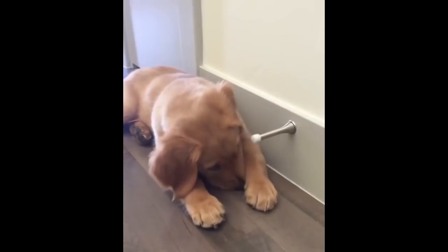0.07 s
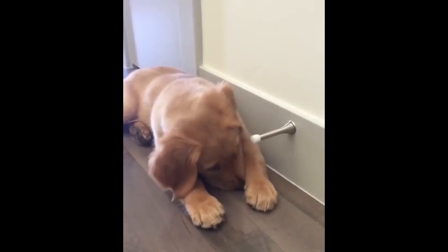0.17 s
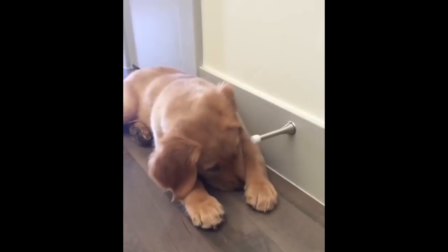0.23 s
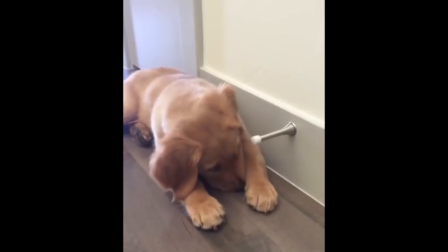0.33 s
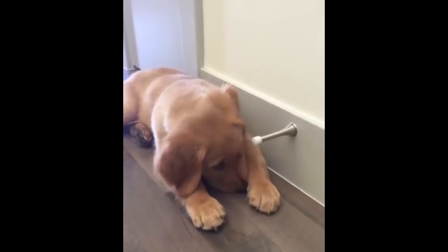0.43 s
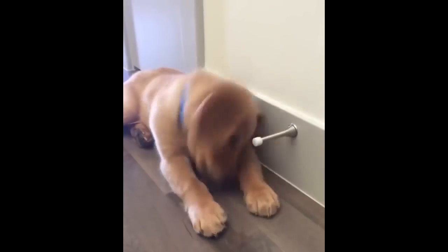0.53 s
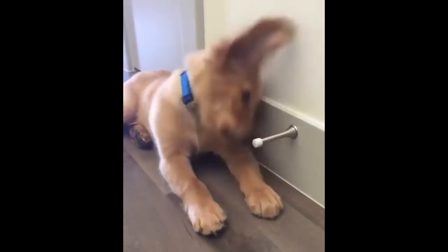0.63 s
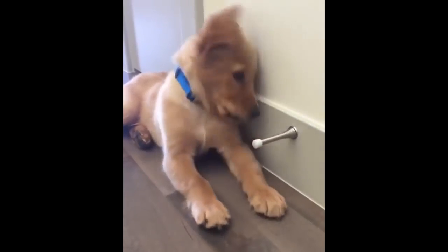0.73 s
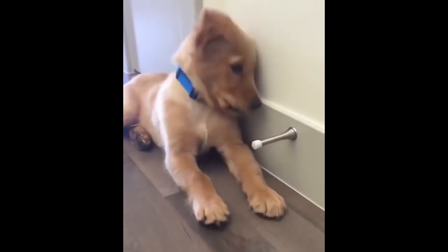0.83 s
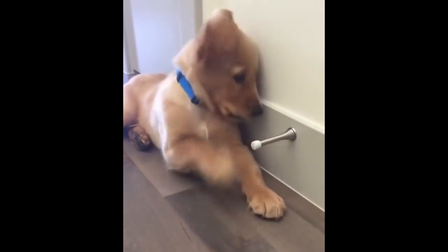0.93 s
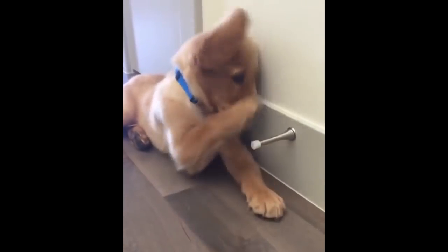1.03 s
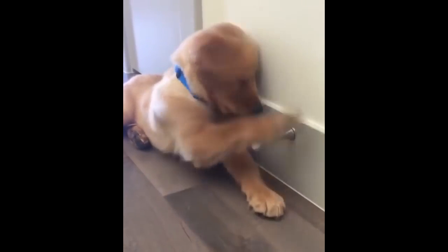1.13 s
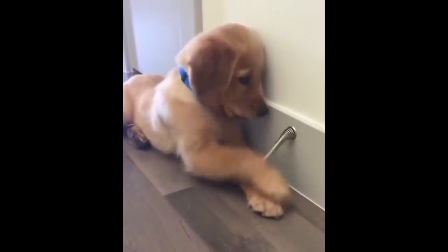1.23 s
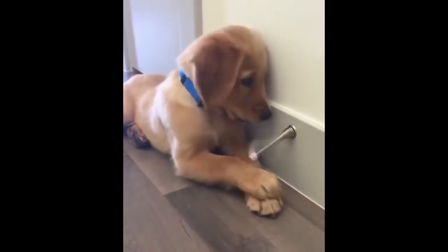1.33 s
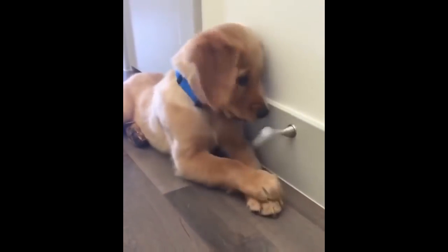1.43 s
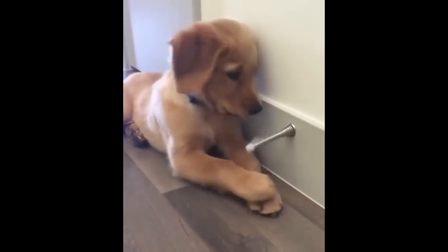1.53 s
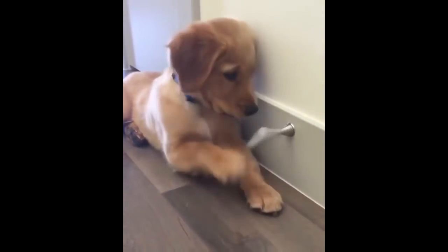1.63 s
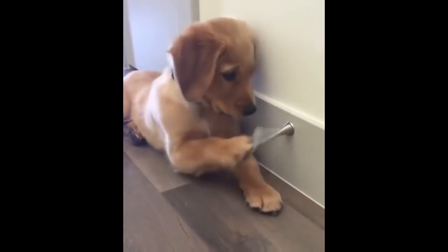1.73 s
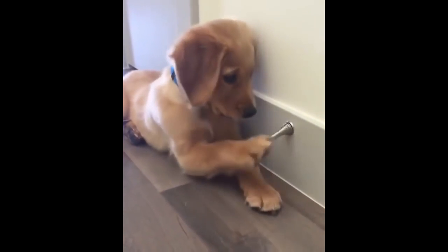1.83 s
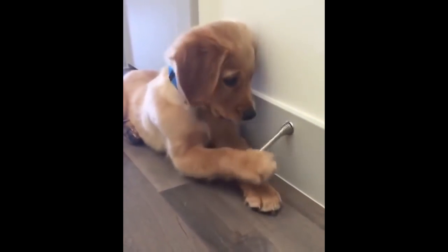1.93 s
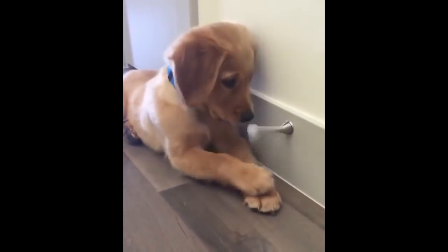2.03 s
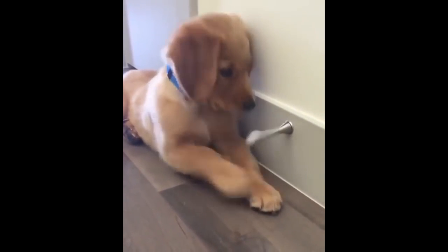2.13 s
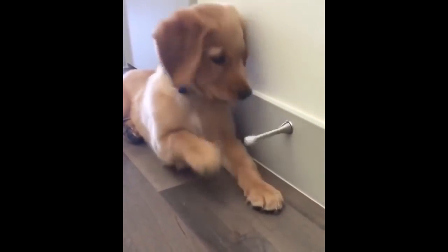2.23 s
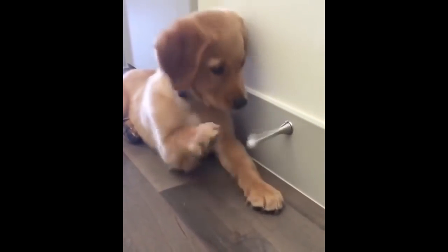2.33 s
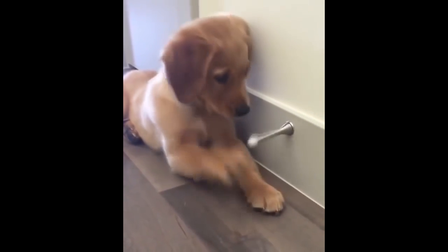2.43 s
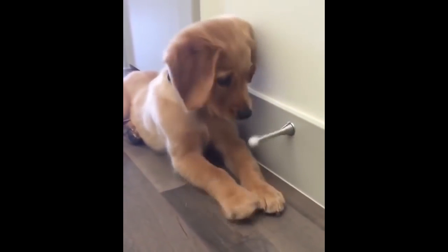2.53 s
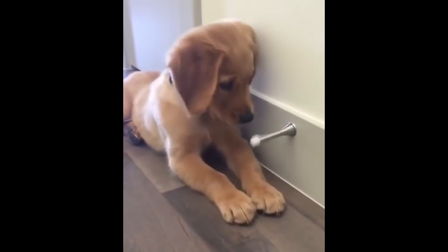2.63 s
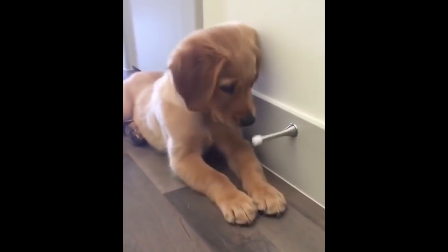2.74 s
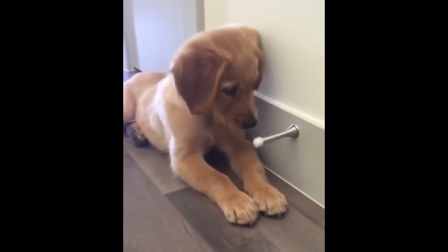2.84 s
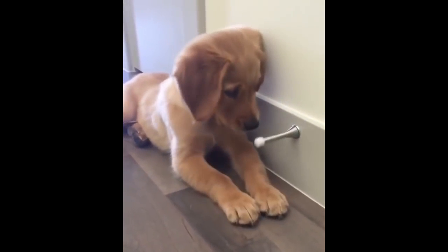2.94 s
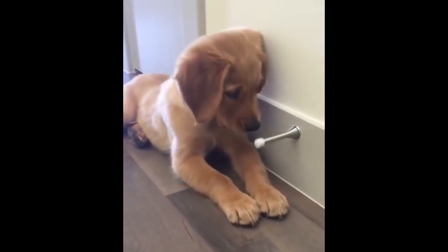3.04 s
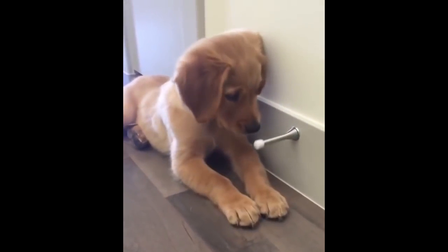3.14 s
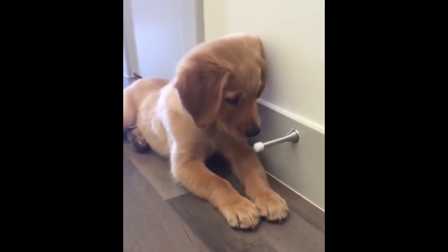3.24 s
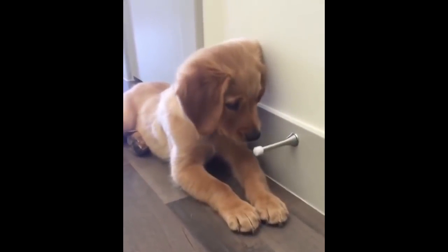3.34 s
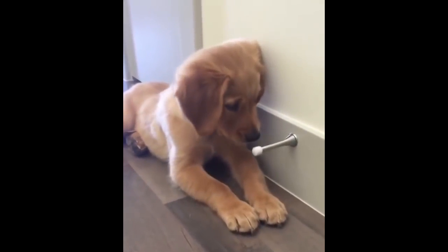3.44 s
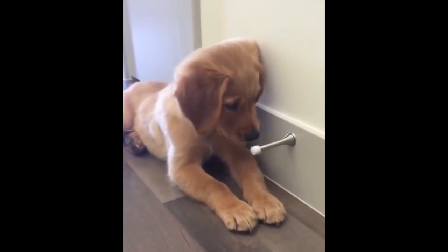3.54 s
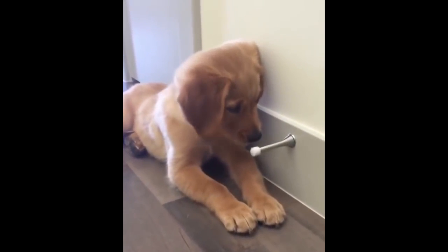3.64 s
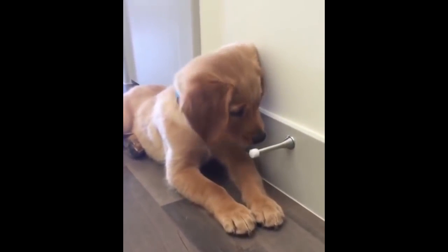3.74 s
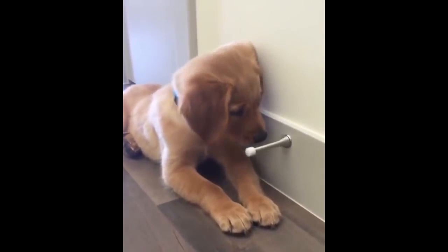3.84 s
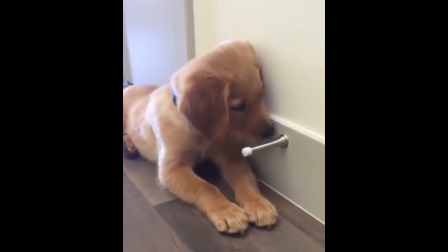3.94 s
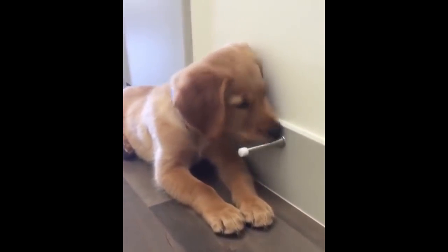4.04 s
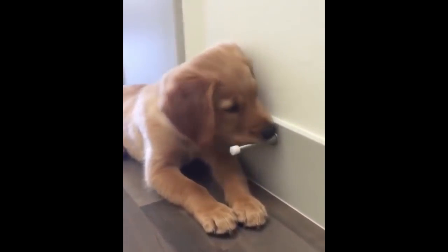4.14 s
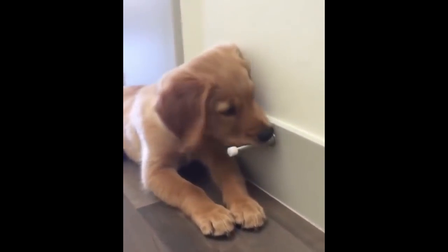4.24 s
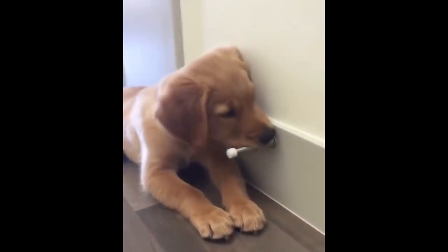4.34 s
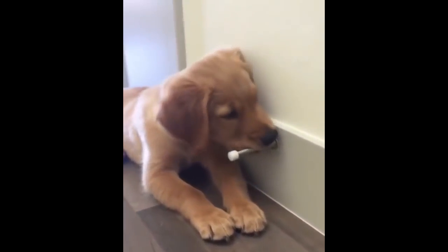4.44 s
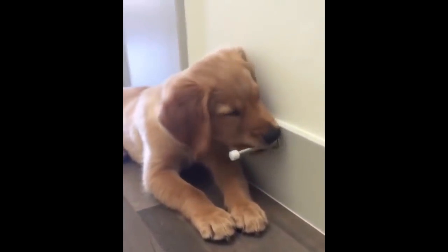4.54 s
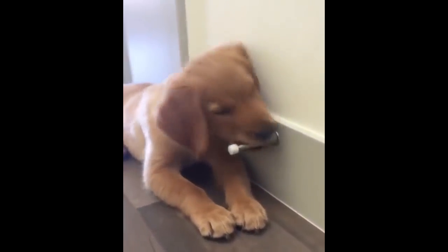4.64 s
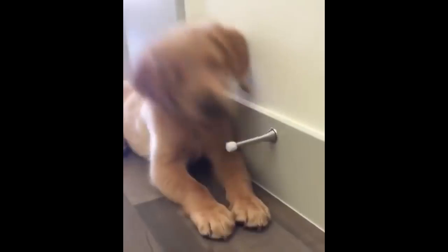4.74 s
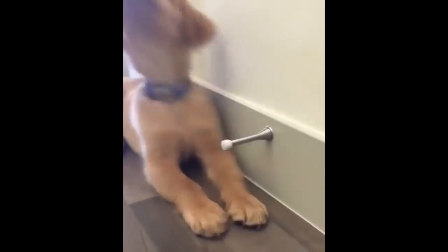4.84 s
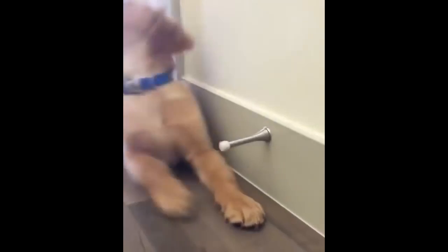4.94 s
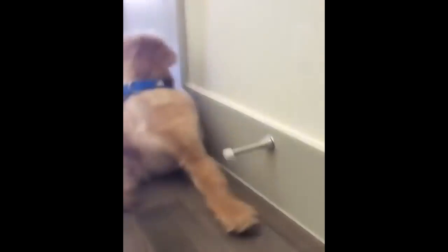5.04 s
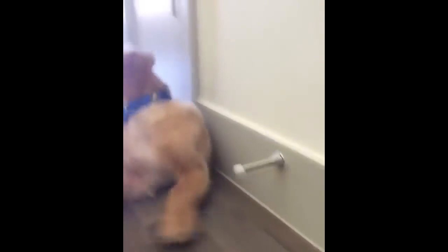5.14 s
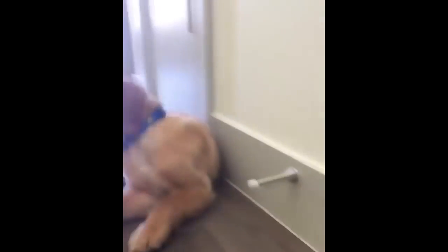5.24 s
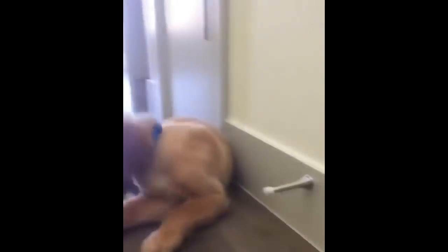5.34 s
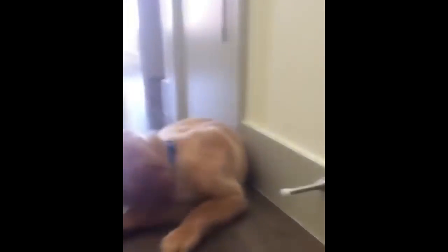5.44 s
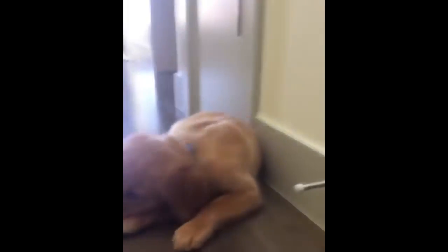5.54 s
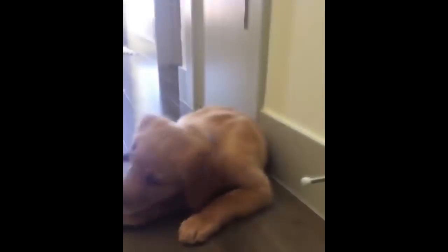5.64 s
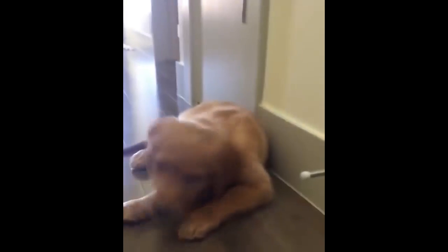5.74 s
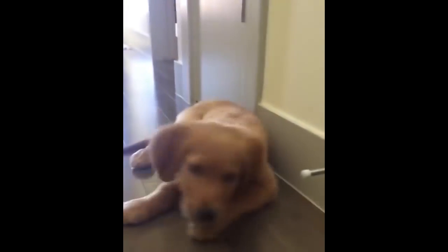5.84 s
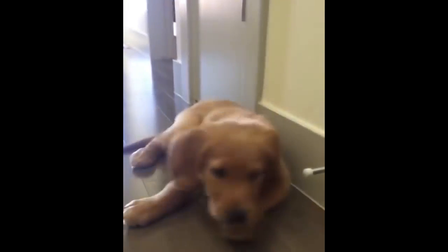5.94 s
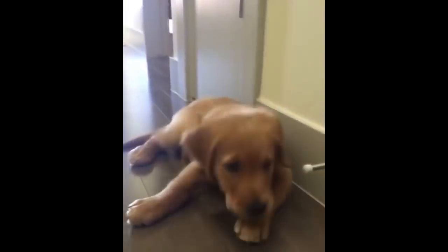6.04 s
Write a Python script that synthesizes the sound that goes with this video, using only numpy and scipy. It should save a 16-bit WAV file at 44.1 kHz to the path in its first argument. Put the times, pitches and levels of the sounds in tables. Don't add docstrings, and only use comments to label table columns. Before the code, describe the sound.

In a quiet hard-floored room, a dying spring buzz and echo open the scene, then faint fur rustle. A puppy's paw touches a coiled door stopper, and it twangs loudly in a rapid clacking flutter, stops, then twangs again, quickening and shrinking to a soft wall hum. Dull nudges, small claw ticks and scuffing paws follow. Close phone microphone, low distant motor hum.

```python
import sys
import numpy as np
from scipy import signal
from scipy.fft import rfft, irfft, next_fast_len
from scipy.io import wavfile
from scipy.ndimage import uniform_filter1d

SR = 44100
rng = np.random.default_rng(int(sys.argv[2]) if len(sys.argv) > 2 else 0)


def rack_gain(trim_db):
    fader = np.asarray(trim_db, float)
    return 10 ** (fader / 20)


def generate_wav(sig):
    pcm = np.round(np.clip(np.atleast_2d(sig).T, -1, 1) * 32767).astype(np.int16)
    wavfile.write(sys.argv[1], SR, pcm)


N = 267775
TIME = np.arange(N) / SR

# start_s, peak_db, clack_minus_peak_db
NUDGES = [(0.639, -49.5, -14), (3.264, -26, -3.5), (3.305, -30.5, -36), (3.465, -32, -17),
          (3.507, -28.5, -9.5), (3.55, -32, -26), (4.265, -39.5, 4), (4.346, -45, -17), (4.378, -45, -19.5),
          (4.452, -37.5, -20), (4.486, -41.5, -21), (4.519, -55, -15.5), (4.812, -35.5, -19),
          (5.016, -53.5, -12), (5.15, -51, -15.5)]
# start_s, clack_db, thump_minus_clack_db, ticks_minus_clack_db, pitch_hz
FIRST_TWANG = [(1.4718, -1.5, -12, -15, 8206), (1.5059, -1.5, -11.0, -18.6, 4215),
               (1.5387, 1.9, -11.5, -14, 5800), (1.5711, -6.5, -10.5, -18.5, 5400),
               (1.6043, -1.5, -17.5, -14, 6195), (1.6383, -7, -12, -16.5, 4190),
               (1.6714, -8.0, -13, -18.5, 4190), (1.703, -3.5, -13.1, -18.5, 4590),
               (1.735, -11, -10.3, -10.8, 5800), (1.7674, -3.0, -15.7, -12.5, 4600),
               (1.8006, -9.5, -14.0, -15.5, 4190), (1.8311, -5.5, -16, -11.8, 9020),
               (1.8664, -11, -20.4, -19.5, 5800), (1.8934, -3.5, -17.5, -18.5, 4200),
               (1.9267, -10.1, -8.5, -13, 4206), (1.956, 0.8, -16.5, -21.5, 4990)]
# start_s, swings_per_s, return_early_share (of a swing)
SWING_RATE = [
    (2.1527, 16.70, .089),
    (2.45, 18.4775, .067),
    (2.7, 20.8558, .05),
    (2.95, 23.5492, .028),
    (3.2, 24.9259, .012),
    (3.5, 24.1381, .012),
    (3.6, 21.6592, .012),
    (3.7, 25.3727, .012),
    (4.2, 27.18, .012),
]


def unit(x):
    return x / np.sqrt(np.mean(x ** 2))


def band(x, lo_hz, hi_hz):
    edges_hz = [lo_hz, min(hi_hz, .45 * SR)]
    return signal.sosfilt(signal.butter(2, edges_hz, "bandpass", fs=SR, output="sos"), x)


def colour(x, points):
    hz, db = np.transpose(points)
    size = next_fast_len(N)
    log_hz = np.log(np.arange(size // 2 + 1) * SR / size + 1)
    gain = rack_gain(np.interp(log_hz, np.log(hz), db))
    return irfft(rfft(x, size) * gain, size)[:N]


def ring(x, hz, t60):
    pole = np.exp(2j * np.pi * hz / SR - np.log(1000) / (t60 * SR))
    return signal.lfilter([1], [1, -pole], x).imag


def modes(force, table):
    return sum(rack_gain(db) * ring(force, hz, t60) for hz, db, t60 in table)


def curve(tables, column):
    rows = np.concatenate(tables)
    inside = sum((TIME >= t[0][0]) & (TIME <= t[-1][0]) for t in tables)
    return np.interp(TIME, rows[:, 0], rows[:, column]), uniform_filter1d(1. * inside, size=800)


def strikes(s, db, rise_s, fall_s):
    train = np.zeros(N)
    np.add.at(train, (np.asarray(s) * SR).astype(int), rack_gain(np.asarray(db)))
    t = TIME[:2000]
    shape = (1 - np.exp(-t / rise_s)) * np.exp(-t / fall_s)
    return signal.fftconvolve(train, shape / shape.max())[:N]


def grit(spread_db):
    grain = np.repeat(rng.exponential(size=N // 8 + 1), 8)[:N]
    return unit(rng.standard_normal(N) * rack_gain(spread_db * grain))


def walk(rate):
    k = int(SR / rate)
    steps = np.repeat(rng.standard_normal(N // k + 1), k)
    return uniform_filter1d(uniform_filter1d(steps, k), k)[:N]


def background():
    # freq_hz, level_db (per Hz)
    air_spectrum = [(15, -55.5), (25, -24.5), (40, -11.5), (108, 0), (145, -19), (212, -24), (256, -33.5),
                    (405, -29.5), (439, -37), (659, -38.5), (1230, -42), (12900, -60), (16000, -80.5)]
    # freq_hz, level_db, crest_s
    hum_lines = [
        (53.4, -54, .4),
        (58.1, -58, .4),
        (106.75, -53, .4),
    ]
    # start_s, low_line_db, octave_db
    hum_load = [
        (0, -2, -8),
        (1.4, -3, -5),
        (3.0, 3, -1.5),
        (4.6, 4.5, 0.5),
        (5.1, -2, 0),
        (6.07, -3, -1),
    ]
    air = colour(rng.standard_normal(N), air_spectrum)
    air = air * rack_gain(-54) / np.std(band(air, 130, 16000))
    low, other, octave = (rack_gain(db + 2 + 1.2 * walk(9.9)) * np.cos(2 * np.pi * hz * (TIME - s))
                          for hz, db, s in hum_lines)
    low_db, octave_db = (curve([hum_load], column=k)[0] for k in (1, 2))
    hum = low * rack_gain(low_db) + rack_gain(-1.0) * other + octave * rack_gain(octave_db)
    return band(air, 120, 18000) + rack_gain(-14.0) * band(air, 20, 130) + hum


def earlier_echo():
    dull = [(150, -8), (240, 0), (400, -16), (800, -12), (1600, -18.5), (3000, -32.5), (8000, -54)]  # Hz, dB
    t60_s = 0.72
    return rack_gain(-40.5 - 60 * TIME / t60_s) * unit(colour(rng.standard_normal(N), dull))


def swing_ends(table):
    at, hz, early = np.transpose(table)
    t = TIME[(TIME >= at[0]) & (TIME <= at[-1])]
    turns = np.cumsum(np.interp(t, at, hz)) / SR
    k = np.arange(int(2 * turns[-1]) + 1)
    back = k % 2
    rough_s = np.interp(k / 2, turns, t)
    end_turns = k / 2 - back * np.interp(rough_s, at, early)
    return np.array([np.interp(end_turns, turns, t), back])


def dying_swing():
    # start_s, level_db
    swings = [
        [(0.0, -42.5), (0.236, -38.5), (0.3, -50), (0.62, -74)],
        [(3.1, -48), (3.4, -45.5), (3.65, -49.5), (3.95, -54.5), (4.15, -57.5), (4.22, -71.5)],
    ]
    # start_s, level_db
    sing = [
        [(0.0, -55.5), (0.2, -72.5), (0.26, -92)],
        [(3.14, -52), (3.3, -54), (3.52, -58.5), (3.62, -77)],
    ]
    sing_hz = (3096, 3660)
    # freq_hz, level_db, t60_s
    panel_modes = [(204, 4, 0.11), (260, 2, 0.07), (293, -8, 0.12), (339.2, 4, 0.19), (361.3, 5, 0.14),
                   (384, 8, .07), (539.4, -9.5, .2), (616, -11, 0.09), (700, -12, 0.1)]
    # start_s, pitch_hz, level_db
    rest_hum = [
        (3.94, 342, -64),
        (4.04, 337.2, -52.5),
        (4.058, 338, -62),
        (4.112, 337.9, -53),
        (4.22, 337.6, -71.5),
    ]
    swing_hz, swing_start_s, return_db = 24.697, 0.021, -16.5
    early = TIME < 1
    count = np.arange(30)
    late_s, back = swing_ends(SWING_RATE)
    s = np.concatenate([swing_start_s + count / (2 * swing_hz), late_s + 0.00607])
    db = return_db * np.concatenate([count % 2, back]) + 1.3 * rng.standard_normal(len(s))
    pull = strikes(s, db, 0.00037, 0.0005)
    swell = rack_gain(-24) * ring(ring(pull * early, 382, .036), 378, .05)
    panel = band(modes(pull, panel_modes), 170, 750) * rack_gain(np.where(early, -5, -1.2))
    level_db, on = curve(swings, column=1)
    tugs = (panel + swell) * rack_gain(level_db - 35.0) * on
    hum_hz, humming = curve([rest_hum], column=1)
    hum_db = curve([rest_hum], column=2)[0]
    hum = rack_gain(hum_db) * humming * np.sin(2 * np.pi * np.cumsum(hum_hz) / SR)
    sing_db, sounding = curve(sing, column=1)
    bunching = (1 + 0.9 * np.cos(2 * np.pi * swing_hz * (TIME - .012))) ** 1.83
    touches = grit(1.6) * bunching * rack_gain(sing_db - 28.5) * sounding
    chatter = ring(touches * early, sing_hz[0], 0.0292) + ring(touches * ~early, sing_hz[1], 0.0218)
    return tugs + hum + band(chatter, 2000, 5500)


def slaps():
    # start_s, thump_db, clack_db, ticks_db, pitch_hz
    flicks = [
        (1.329, -27, -34, -25, 4600),
    ]
    # start_s, clack_db, thump_minus_clack_db, ticks_minus_clack_db, pitch_hz
    second_twang = [(2.1534, 1.2, -12, -22, 8600), (2.179, 1.5, -13, -18.5, 9000),
                    (2.2122, -5.5, -13.2, -24.5, 8200), (2.24, -3.2, -15, -21, 8990),
                    (2.2665, -18.3, -10.7, -16, 6200), (2.297, -14.4, -2, -14, 8200),
                    (2.3255, -6.5, -12.5, -18.5, 5806), (2.3527, -12.5, -10, -22, 4200),
                    (2.3789, -4.8, -14, -21.2, 4600), (2.409, -5.5, -24, -19, 9000),
                    (2.4376, -14, -15.1, -14.5, 4195), (2.4626, -5.9, -12.6, -22.5, 8590),
                    (2.4924, -17.5, -6, -14, 4207), (2.5157, -8, -12, -23.5, 4204),
                    (2.5464, -6, -10.3, -13, 6200), (2.5666, -1.5, -13.5, -24.0, 5000),
                    (2.5972, -3.5, -18.5, -20.5, 5800), (2.6149, -20.5, 1.1, -11, 6595),
                    (2.6452, -10, -11.5, -13, 5403), (2.6657, -21.6, -5, -14, 6600)]
    narrowing = [(2.6948, -26.2, -2, -2.5, 6600), (2.7169, -13.0, -11, -19.5, 8600),
                 (2.7423, -18.5, -5.5, -7, 6600), (2.7644, -5, -16.5, -26, 4210),
                 (2.7888, -8, -10.4, -12.4, 4200), (2.8067, -14.5, -5.6, -20, 4200),
                 (2.8338, -6.5, -9.5, -19.5, 5800), (2.8517, -20.6, 0, -23.2, 8990),
                 (2.8784, -21, -0.5, -6.5, 4590), (2.8957, -10, -24, -23.5, 4200),
                 (2.9216, -11, -11, -19, 5390), (2.9413, -20.5, -7.9, -28, 4990),
                 (2.9645, -17, -7.5, -16, 5400), (2.9814, -16, -13.6, -32.4, 8210),
                 (3.0062, -12.5, -12.5, -20.5, 6210), (3.0247, -22.5, -3.5, -24.4, 4196),
                 (3.0464, -11, -12.1, -21, 6200), (3.0661, -26.4, -3, -21.6, 5795),
                 (3.0894, -14, -14, -17, 5400), (3.1298, -21, -8, -18, 4600), (3.1704, -28, -12, -18, 5010)]
    # start_s, out_thump_db, return_minus_out_db, clack_minus_thump_db, ticks_minus_thump_db
    force = [
        (3.2, -31, 0, -4, -13),
        (3.33, -45.5, 4, -1, -14.5),
        (3.5, -52.5, 6, 4.5, -7.5),
        (3.68, -53, -11, -15, 4.5),
        (3.95, -70.5, -8, -12, 0),
    ]
    lopsided = (0.5, 0.873, 1.01)
    scatter_db = (1.5, 3, 1)
    at, peak_db, low_db, high_db, hz = np.concatenate([FIRST_TWANG, second_twang, narrowing]).T
    lead_s = .002
    wide = [at - lead_s, peak_db + low_db + 5, peak_db - 6, peak_db + high_db + 6, hz]
    s, back = swing_ends(SWING_RATE)[:, :-13]
    faint = s > force[0][0]
    s, back = s[faint], back[faint]
    rows = np.array(force)
    out_db, side_db, clack_db, tick_db = (np.interp(s, rows[:, 0], column) for column in rows.T[1:])
    db = out_db + np.array([0 * s, clack_db, tick_db]) + np.outer(lopsided, back * side_db)
    db = db + (rng.standard_normal((len(s), 3)) * scatter_db).T
    return np.hstack([np.transpose(flicks), wide, np.vstack([s, db, 6600 + 0 * s])])


def coil_ticks(s, tick_db, tick_hz):
    # start_s, peak_db
    claw_ticks = [
        (4.2596, -43),
        (4.2743, -42),
        (4.811, -42.5),
    ]
    # freq_hz, level_db (per Hz)
    coil = [(1760, -14.5), (3000, -10), (3830, -10.5), (5840, -8), (7670, -13.5), (8880, -10), (11400, -20),
            (13300, -15), (16000, -43.5)]
    claw_s, claw_db = np.transpose(claw_ticks)
    spray = strikes(s + 0.001322, tick_db, 0.0013, .0013)
    spray = spray + rack_gain(-4.5) * strikes(claw_s, claw_db, 0.000326, 0.0019)
    pitch = tick_hz[(np.searchsorted(s, TIME) - 1).clip(0)]
    turn = unit(band(grit(1.5), 20, 700)) * np.cos(2 * np.pi * np.cumsum(pitch) / SR)
    ticks = spray * (rack_gain(-3) * unit(colour(grit(2.9), coil)) + rack_gain(-1.5) * turn)
    fine_db = np.interp(TIME, [2.8, 3.2, 3.7, 3.95, 4.1], [-12, 1.5, 7, 5, -20])
    return ticks + rack_gain(fine_db) * band(ticks, 9500, 18000)


def bending_wave(s, db):
    t = TIME[:600]
    hz = 350 + 5000 * np.exp(-t / 0.001076)
    whip = np.sin(2 * np.pi * np.cumsum(hz) / SR) * (1 - np.exp(-t / 0.00013)) * np.exp(-t / 0.0015)
    return signal.fftconvolve(strikes(s, db, .00003, .00004), whip)[:N]


def board_clack(s, clack_db):
    # freq_hz, level_db, t60_s
    board = [(639.05, 1.5, 0.017), (930, -8, 0.005), (1122.4, -3, 0.011), (1580, 0, 0.0087),
             (1775, 5, 0.01), (2138, -0.5, 0.0054), (2640, -3.5, 0.005), (3194, -4.5, 0.0043)]
    nudge_s, nudge_db, dull_db = np.transpose(NUDGES)
    rattle = strikes(s + .002, clack_db, 0.00068, 0.0028)
    rattle = rattle + rack_gain(-2.0) * strikes(nudge_s, nudge_db + dull_db, 0.002, 0.0091)
    force = rack_gain(-7) * bending_wave(s + 0.0014721, clack_db) + rack_gain(-3.5) * rattle * grit(1.3)
    clack = force + rack_gain(-23) * modes(force, board)
    bright_db = np.interp(TIME, [1.5, 2.6, 3.3], [3.5, 1.5, -3])
    return band(clack, 590, 1637) + rack_gain(bright_db) * band(clack, 1722, 3200)


def wall_thump(s, thump_db):
    # freq_hz, level_db, t60_s
    wall = [(189, -14.5, 0.096), (253, -2, 0.024), (302.4, 4.5, 0.018), (358.7, 4, 0.042),
            (383.8, -6.5, 0.062)]
    nudge_s, nudge_db, _ = np.transpose(NUDGES)
    push = strikes(s + .003, thump_db, 0.00022, 0.00036) + strikes(nudge_s, nudge_db, 0.0006, 0.0015)
    return rack_gain(-35) * band(modes(push, wall), 180, 820)


def taut_spring(s):
    # freq_hz, level_db, t60_s
    taut_coil = [(365.6, -3, .05), (581, -4.5, .03), (1217, 3, .03), (1590, -3, 0.015), (2410, -6, 0.0096),
                 (3956, 5, 0.015), (5280, 4, 0.012)]
    held = (TIME > s[0]) * (TIME < FIRST_TWANG[0][0])
    rub = held * np.exp(-(TIME - s[0]).clip(0) / .07) * grit(1.6)
    tap = strikes(s[:1] + .003, [-24], .0006, .001)
    return rack_gain(-68) * modes(rub, taut_coil) + rack_gain(-32.5) * ring(tap, 366, .045)


def floor(s, thump_db):
    # freq_hz, level_db, t60_s
    joists = [(62.5, -7.5, .3), (97, 4, .45), (152.46, -12, .12)]
    # start_s, level_db
    thuds = [
        (1.5, -29.5),
        (1.72, -27),
        (2.0, -15),
        (2.67, -15),
        (4.47, -28.5),
        (5.03, -32),
    ]
    shaking = s < 3.49
    shake = strikes(s[shaking], -32 + .3 * thump_db[shaking], .001, 0.0012)
    thud_s, thud_db = np.transpose(thuds)
    thud = ring(strikes(thud_s, thud_db, .002, .0025), 98, 0.24)
    return rack_gain(-48) * band(modes(shake, joists), 50, 300) + rack_gain(-46) * band(thud, 85, 200)


def stopper():
    s, thump_db, clack_db, tick_db, tick_hz = slaps()
    metal = rack_gain(-3.5) * coil_ticks(s, tick_db, tick_hz) + taut_spring(s)
    wood = rack_gain(-2.5) * board_clack(s, clack_db)
    return metal + wood + wall_thump(s, thump_db) + floor(s, thump_db)


def fur():
    # peak_s, level_db, fade_20db_s, scuff_minus_level_db
    fur_drags = [(0.68, -64, 0.15, -5), (0.815, -65.5, 0.1, -8), (0.93, -81, 0.06, -1.5),
                 (1.04, -73, 0.66, -2.5), (4.245, -65, 0.16, -12), (4.275, -60, 0.01, 11),
                 (4.41, -86, 0.13, 6), (5.06, -68, 0.2, -10), (5.12, -62.5, 0.1, -18),
                 (5.0, -72, 0.07, -5.5), (5.17, -60.5, 0.12, -8), (5.27, -66.5, 0.1527, -10),
                 (5.36, -70, 0.2754, -4.5), (5.69, -72, .07, 4), (6.03, -68, 0.13, -6),
                 (6.065, -63.5, 0.18, -5.5)]
    # freq_hz, level_db (per Hz)
    fur_colour = [(1290, -13.5), (2200, -6), (3650, 1), (4790, -4), (6000, -2), (8620, -5.5), (13300, -8.5),
                  (15000, -34.5)]
    rise_share = 0.686
    hiss = unit(colour(grit(1.82), fur_colour)) * rack_gain(2.2 * walk(46))
    scuff = unit(band(grit(1.5), 600, 2500))
    hiss_level = scuff_level = 0
    for s, db, fade_s, low_db in fur_drags:
        away_s = np.maximum(TIME - s, (s - TIME) / rise_share)
        drag = rack_gain(db - 20 * away_s / fade_s)
        hiss_level = hiss_level + drag
        scuff_level = scuff_level + drag * rack_gain(low_db)
    return hiss * hiss_level + scuff * scuff_level


def pads():
    # start_s, length_s, pitch_hz, level_db
    squeaks = [
        (5.1, .05, 3750, -60),
        (5.11, .055, 6050, -66),
        (5.7, .045, 1650, -67),
        (5.21, .085, 3660, -65),
        (5.04, .03, 4200, -70),
        (4.262, .035, 1940, -55),
        (4.262, .03, 560, -54),
        (4.3, .14, 1500, -68),
    ]
    rub = grit(1.2)
    return sum(rack_gain(db) * unit(ring(rub, hz, .012)) * np.sin(np.pi * ((TIME - s) / length_s).clip(0, 1)) ** .6
               for s, length_s, hz, db in squeaks)


def room(x):
    # freq_hz, t60_s, wet_db
    room_bands = [(150.3, 0.81, -6), (265.05, 0.7, -12), (376, .55, -11.5), (548, 0.9, -13),
                  (805.6, 1.07, -6.5), (1572, 0.72, -6.5), (2896, 0.64, -7.5), (4645, 0.8, -14.5),
                  (7940, 0.7, -15.5), (12500, 0.36, -13.5)]
    t = TIME[:SR]
    tails = 0
    for hz, t60, db in room_bands:
        noise = unit(band(rng.standard_normal((2, SR)), hz / 1.3725, hz * 1.35))
        tails = tails + rack_gain(db) * noise * np.sqrt(hz / t60) * rack_gain(-60 * t / t60)
    tails = rack_gain(-74.0) * tails * (1 - np.exp(-t / 0.0047))
    facing = 2.5 * walk(12)
    shares = np.cos(facing), np.sin(facing)
    echo_s, echo_db = .0036, -7.5
    echo = rack_gain(echo_db) * np.pad(x, (int(echo_s * SR), 0))[:N]
    return echo + sum(signal.fftconvolve(x * share, tail)[:N] for share, tail in zip(shares, tails))


def scene():
    near = stopper() + dying_swing()
    return (near + earlier_echo() + fur() + pads() + room(near) + background())[None]


def roll_off(x):
    return signal.sosfilt(signal.butter(12, 16630, fs=SR, output="sos"), x)


def record(dry):
    rounded = np.tanh(0.73 * dry) / 0.8476
    dimmed = signal.sosfilt(signal.butter(8, 13650, fs=SR, output="sos"), rounded)
    return roll_off(dimmed + rack_gain(-24.5) * rounded)


dry = scene()
out = record(dry)
generate_wav(out)
```